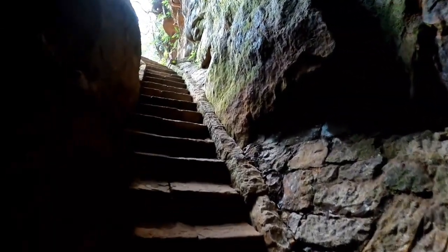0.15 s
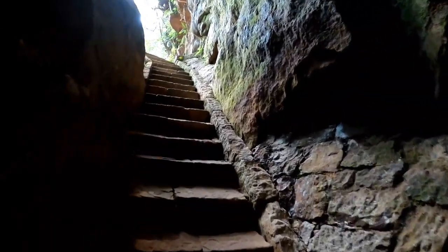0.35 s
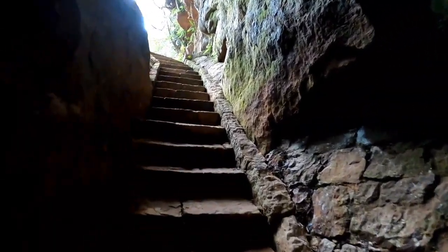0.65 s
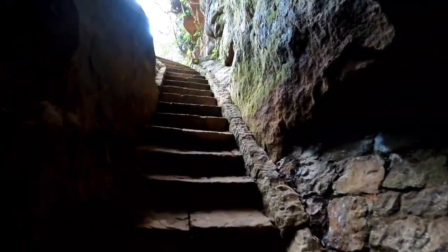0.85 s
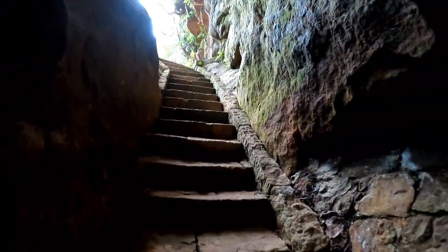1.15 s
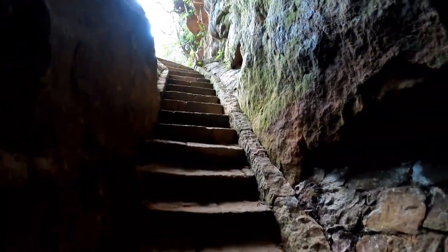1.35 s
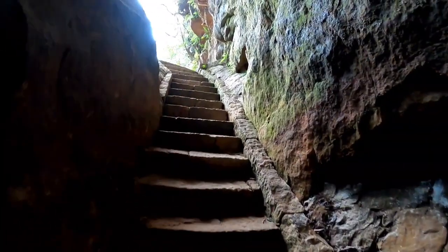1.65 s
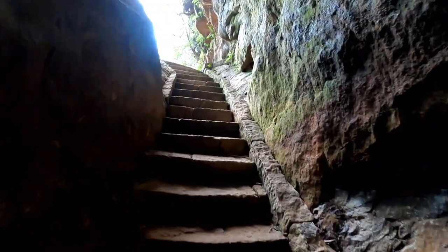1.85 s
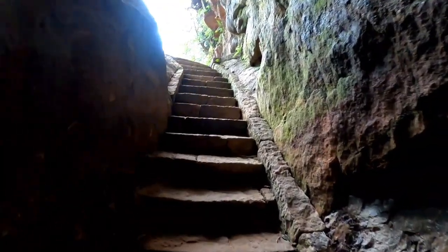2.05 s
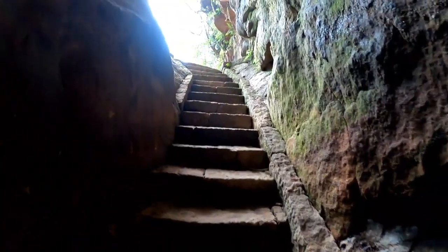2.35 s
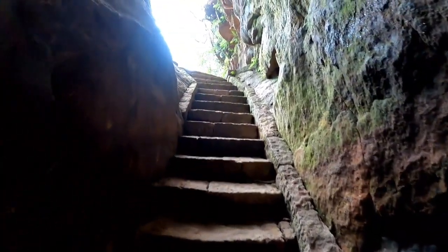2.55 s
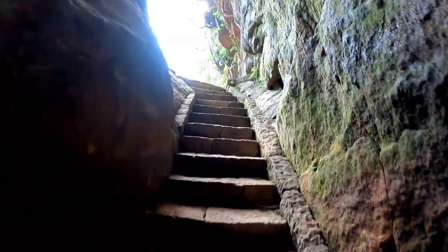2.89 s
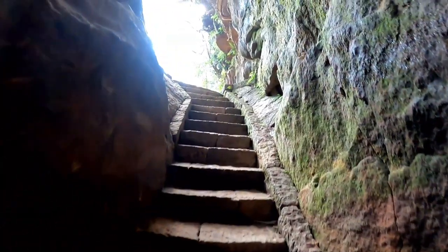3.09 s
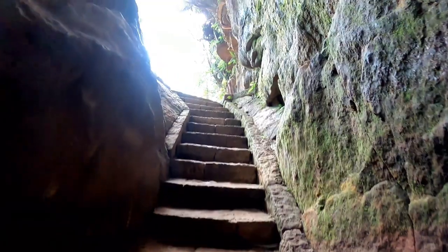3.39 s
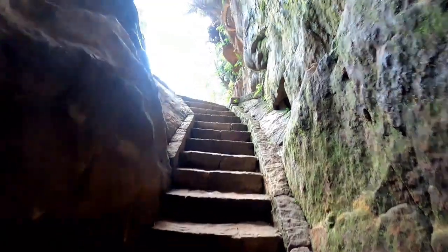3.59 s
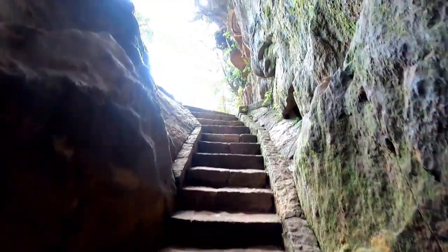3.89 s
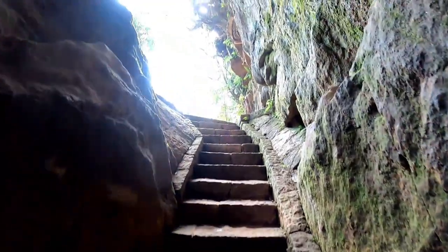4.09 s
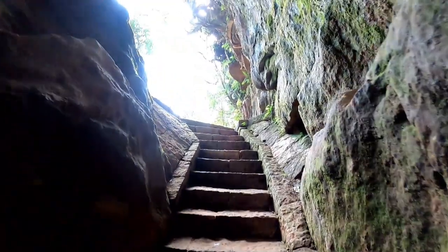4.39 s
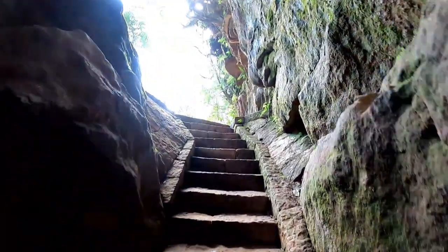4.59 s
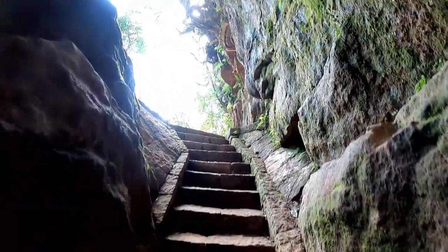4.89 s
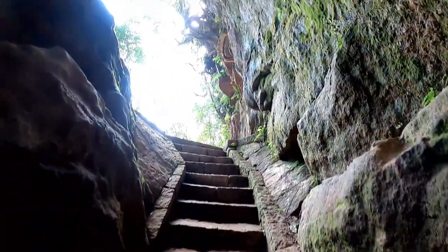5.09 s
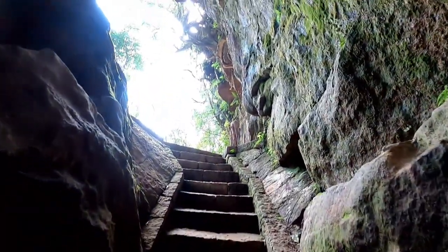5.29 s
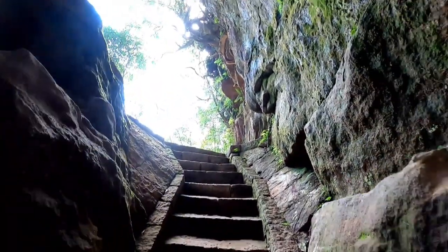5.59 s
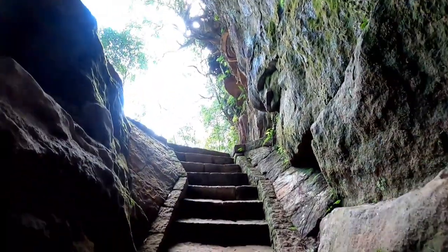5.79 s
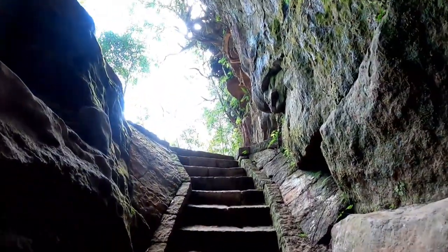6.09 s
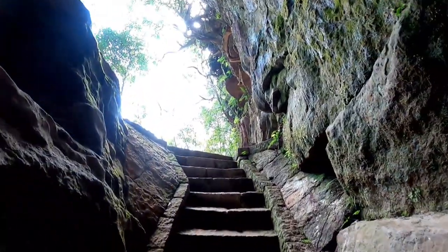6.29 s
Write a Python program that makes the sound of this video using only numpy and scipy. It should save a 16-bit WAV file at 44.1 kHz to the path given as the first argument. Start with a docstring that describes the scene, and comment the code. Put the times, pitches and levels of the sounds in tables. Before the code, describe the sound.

Close, handheld sound of one person climbing stone steps between rock walls. About every 0.8 seconds a shoe thuds down, grit crunches, the sole slaps and sand grinds. Scuffs, taps and dull knocks fall between; a short rubber squeak comes before a sharp double crack midway, and a hollow clatter near five seconds. Walls ring briefly over faint outdoor hiss.

```python
"""In a narrow rock passage, someone climbs gritty stone steps, carrying the microphone.
In every step the shoe skims in, lands with a thud and a crunch, the sole slaps down, and sand grinds under the weight.
Between and around the steps a shoe often scuffs over the stone; soles rasp and squeak.
Short taps and cracks, hollow bumps and a rattle fall between. Filtered noise makes the grit, decaying sines the thuds.
The walls ring briefly over a faint outdoor hiss, a fading rush and the rumble of the carrying hand."""
import sys
import numpy as np
from scipy import signal
from scipy.fft import rfft, irfft, next_fast_len
from scipy.io import wavfile
from scipy.ndimage import uniform_filter1d

SR = 44100
rng = np.random.default_rng(int(sys.argv[2]) if len(sys.argv) > 2 else 0)


def wav_record(signal):
    """Record a signal, one row per channel, as 16-bit PCM in the file named by sys.argv[1]."""
    frames = np.transpose(np.atleast_2d(signal))
    bounded = np.clip(frames, -1, 1)
    # unit amplitude maps onto the largest positive 16-bit level
    quanta = np.round(bounded * 32767).astype(np.int16)
    wavfile.write(sys.argv[1], SR, quanta)


N = 284445
TIME = np.arange(N) / SR

# Levels are inputs to the filters and mix; colour tables give only the relative loudness of frequencies.
# Half length: from the middle of a slide to where its force is down to 61 %.

# A shoe lands: (time [s], thud level [dB], thud pitch [Hz], knock level [dB], crunch level [dB],
#   fine sand level [dB], crunch pitch [Hz], sole's crunch against landing [dB], rise [s], decay [s],
#   sole follows after [s], sole's knock against landing [dB], grinding level [dB], grinding ends after [s])
FOOTSTEPS = [(0.262, -29, 255, -40, -38, -55.5, 2770, -5.5, 0.0025, 0.012, 0.043, -9.5, -51.5, 0.33),
             (1.079, -26, 230, -37, -36, -46.5, 2310, 0, 0.0023, 0.034, 0.048, 0.5, -46.5, 0.26),
             (1.896, -30.5, 170, -43.5, -46.5, -52, 2200, -8.5, 0.0094, 0.014, 0.044, -21, -51, 0.41),
             (2.735, -24, 238, -27.5, -25.5, -38.5, 2500, -11.5, 0.0058, 0.013, 0.052, -11.5, -54, 0.36),
             (3.506, -43, 160, -29.5, -22, -43, 2700, -5.5, 0.011, 0.027, 0.073, -10, -52, 0.41),
             (4.425, -21.5, 170, -33.5, -41.5, -57, 3260, -5.5, 0.0035, 0.021, 0.048, -19, -52.5, 0.41),
             (5.377, -29.5, 186, -36, -28.5, -53, 2800, -7.5, 0.0044, 0.0057, 0.047, -5.5, -52.5, 0.38),
             (6.325, -25.5, 380, -28.5, -38.5, -51, 3550, -8, 0.0021, 0.0045, 0.037, -24, -50, 0.23)]
# Short taps and cracks of shoe and grit, faint to loud:
#   (time [s], crunch level [dB], crunch pitch [Hz], knock level [dB], decay [s])
SHORT_TAPS = [(0.154, -43.5, 2540, -84, 0.025), (0.508, -43, 4000, -73, .008),
              (0.748, -50, 1390, -44, 0.011), (1.049, -43, 3900, -68, 0.003),
              (1.210, -38, 1500, -48, 0.0083), (1.271, -50, 3200, -60, 0.0058),
              (1.314, -43, 1320, -49, .007), (1.45, -49.5, 2140, -50, 0.011), (1.73, -46, 1400, -78, 0.039),
              (2.03, -38.5, 2020, -76, 0.015), (2.125, -44, 3300, -72, 0.0043),
              (2.370, -52, 1500, -49, 0.013), (2.552, -50.5, 2760, -57, 0.021),
              (3.480, -44.5, 2400, -64, 0.014), (3.519, -29, 2540, -32, 0.0026),
              (3.531, -24, 3400, -28, .004), (3.636, -34, 3000, -42, .005), (3.880, -42, 2200, -47, 0.011),
              (3.957, -45, 3160, -48.5, 0.0051), (4.634, -44, 1880, -53, 0.034),
              (4.822, -38.5, 2880, -68, 0.0047), (5.29, -45.5, 3470, -66, 0.014),
              (5.466, -37.5, 4000, -48, 0.0059), (5.536, -39.5, 3080, -51.5, 0.016)]
# Colour of the sole's knock: (frequency [Hz], level [dB per Hz])
KNOCK_COLOUR = [(130, -11.5), (250, -3), (350, -2), (490, 2.5), (610, -3), (800, -3), (1050, 0),
                (1400, -9.5), (2000, -11.5), (4000, -62)]
# Colour of crunching grit: (frequency [Hz], level [dB per Hz])
CRUNCH_COLOUR = [(400, -52), (900, -3.5), (1400, 4.5), (2100, 3.5), (2600, 5), (3000, 3), (3350, 6.5),
                 (3900, 4.5), (4250, 2.5), (4700, -5), (6300, -6.5), (9000, -17.5), (15000, -53)]
# Colour of fine sand: (frequency [Hz], level [dB per Hz])
SAND_COLOUR = [(2000, -13), (4000, -0.5), (5200, -0.5), (6400, -4.5), (8000, -13), (10500, -15),
               (12000, -22.5), (15000, -27)]
# The sole comes down flatter and sandier than the landing
SOLE_SAND_DB, SOLE_THUD_DB, SOLE_HALF_S = 7.5, -11, 0.011
# Sand grinds while the weight rolls over the foot: (rub, crunch, fine sand) against the grinding level
GRIND_TILT_DB, GRIND_FROM_S, GRIND_FADE_S = (-14, -1.5, -6.5), 0.091, 0.059
# Single grains crack under the weight: level against the grinding, decay, range of pitch
CRACK_DB, CRACK_DECAY_S, CRACK_HZ = 5.5, 0.004, (1280, 4140)
HARD_CRUNCH_DB = -25    # crunch level that brings in the narrow peaks fully


def footfalls(tap_rise_s=0.002, step_q=0.85, tap_q=2.8, cracks_per_step=3):
    """Every contact drives the sole's knock and the crunch of grit under it; a few grains crack afterwards."""
    grit = texture(CRUNCH_COLOUR, grains_per_s=7000, grain_db=-2.0, even_s=0.0041)
    power, crunch, hard = np.zeros((3, 2, N))     # power rows: knock, fine sand
    for (s, _, _, knock_db, crunch_db, sand_db, hz, sole_crunch_db, rise, decay,
         sole_after, sole_db, grind_db, grind_ends) in FOOTSTEPS:
        landing = blow(s, rise, decay)
        sole = swell(s + sole_after, SOLE_HALF_S)
        power += drive([knock_db, sand_db], landing)
        power += drive([knock_db + sole_db, sand_db + sole_crunch_db + SOLE_SAND_DB], sole)

        force = np.hypot(landing, from_db(sole_crunch_db) * sole)
        crushed = focus(from_db(crunch_db) * force * grit, hz, step_q)
        crunch += crushed
        hard += min(from_db(crunch_db - HARD_CRUNCH_DB), 1) * crushed

        earliest, latest = (GRIND_FROM_S, CRACK_HZ[0]), (grind_ends, CRACK_HZ[1])
        for after, crack_hz in rng.uniform(earliest, latest, (cracks_per_step, 2)):
            crack = from_db(CRACK_DB + grind_db) * blow(s + after, tap_rise_s, CRACK_DECAY_S)
            crunch += focus(crack * grit, crack_hz, tap_q)
    for s, crunch_db, hz, knock_db, decay in SHORT_TAPS:      # no fine sand here
        force = blow(s, tap_rise_s, decay)
        power[:1] += drive([knock_db], force)
        crunch += focus(from_db(crunch_db) * force * grit, hz, tap_q)
    knock, sand = np.sqrt(power)
    knocks = knock * texture(KNOCK_COLOUR, even_s=0.0036)
    fine_sand = sand * texture(SAND_COLOUR, grains_per_s=13000, grain_db=-1.5)
    return crunch + narrow_peaks(hard) + knocks + fine_sand


# Dull hollow knocks, faint to strong: (time [s], level [dB], pitch [Hz])
DULL_KNOCKS = [(.748, -38.5, 384), (1.446, -45.5, 520), (1.791, -41.5, 277), (1.803, -42, 450),
               (1.873, -41, 420), (1.93, -36, 330), (2.258, -45, 300), (2.282, -44, 320), (4.926, -31, 330),
               (4.944, -34, 250), (4.954, -24.5, 730), (4.977, -28, 600), (5.001, -34, 480),
               (5.765, -41.5, 330), (5.788, -37, 330), (5.812, -41, 322), (5.975, -46, 450),
               (6.203, -34, 443), (6.232, -37.5, 400)]
# Shoe and step under the weight of a footfall: (frequency [Hz], level [dB], time to fall 60 dB [s])
THUD_MODES = [(48, -15, .1), (80, -5.5, 0.036), (163.5, -8.5, 0.094), (224.6, -7.5, 0.071),
              (327.3, -6.5, 0.046), (442, -4.5, 0.058), (774, -10, 0.072), (1110, -30, 0.021),
              (1270, -18, .05)]


def thuds(uneven_db=2.5, push_s=0.0041, db_per_octave=8.0, slap_hz=200):
    """Weight pushed onto the step rings the same low modes; each contact favours those near one pitch."""
    contacts = [row[:3] for row in FOOTSTEPS] + list(DULL_KNOCKS)
    contacts += [(s + sole_after, db + sole_db + SOLE_THUD_DB, slap_hz)
                 for s, db, *_, sole_after, sole_db, _, _ in FOOTSTEPS]
    hz, mode_db, t60 = np.transpose(THUD_MODES)[:, :, None]
    age = TIME[:SR // 4]
    out = np.zeros(N + SR)
    signs = (-1) ** np.arange(len(THUD_MODES))[:, None]
    envelopes = from_db(mode_db - 60 * age / t60) * np.minimum(age / push_s, 1)
    rings = signs * envelopes * np.sin(2 * np.pi * hz * age)
    chances = rng.normal(0, uneven_db, (len(contacts), len(THUD_MODES)))
    for (s, db, pitch), chance in zip(contacts, chances):
        start = int(s * SR)
        strengths = db + chance - db_per_octave * np.abs(np.log2(hz[:, 0] / pitch))
        out[start:start + len(age)] += from_db(strengths) @ rings
    return out[:N]


# Narrow peaks colour the crunch of hard landings:
#   (frequency [Hz], width [Hz], level against the crunch [dB])
CRUNCH_PEAKS = [(2512, 41, 3.5), (3100, 43, 3), (3725, 72, 3.5), (3990, 26, 5)]


def narrow_peaks(x):
    """A few narrow resonant filters pick out pitches in the crunch of hard landings."""
    out = 0
    for hz, width, db in CRUNCH_PEAKS:
        b, a = signal.iirpeak(hz, hz / max(width, 10), fs=SR)
        out = out + from_db(db) * signal.lfilter(b, a, x)
    return out


# A shoe scuffs over the stone: (time [s], rub level [dB], crunch level [dB], crunch pitch [Hz],
#   fine sand level [dB], half length [s])
SHOE_SCUFFS = [(0.543, -64, -46.5, 4000, -56, 0.017), (1.293, -70, -47.5, 2350, -74, 0.024),
               (1.838, -62, -49, 2200, -55, 0.017), (2.276, -53.5, -51.5, 1960, -67, 0.032),
               (2.703, -54.5, -53, 2400, -60, 0.05), (3.007, -75, -46.5, 3980, -51.5, 0.017),
               (3.039, -50.5, -40, 1640, -46, 0.0095), (3.085, -39.5, -43, 3520, -51, 0.026),
               (3.765, -53.5, -57, 1700, -72, 0.015), (3.826, -55.5, -50, 3430, -70, 0.041),
               (4.764, -76, -61, 3500, -53.5, 0.017), (4.978, -52, -49, 1400, -68, 0.037),
               (5.322, -52, -56, 1300, -64, 0.017), (5.356, -61, -51.5, 3700, -57, 0.016),
               (5.759, -60, -49.5, 2980, -53, 0.016), (5.792, -52, -51, 2440, -55, 0.021),
               (6.238, -55, -76, 1000, -78, 0.027)]
# Colour of dragged grit: (frequency [Hz], level [dB per Hz])
DRAG_COLOUR = [(400, -41), (900, 8.5), (1500, 3.5), (2400, 5), (3300, 4), (4100, 4.5), (4800, -22),
               (6500, -41), (10000, -44)]
# The shoe skims in around the landing, strongest just before it: (rub, crunch, fine sand)
SKIM_DB, SKIM_LEAD_S, SKIM_HALF_S = (-71, -59.5, -65), 0.0038, 0.079


def scuffs(catch_db=1.5, catches_per_s=70, drag_q=2.0):
    """A sole that skims in, bears weight or scuffs over stone rubs dully and rolls sand, catching unevenly."""
    power = np.zeros((3, N))     # rows: rub, crunch, fine sand
    for s, *_, grind_db, grind_ends in FOOTSTEPS:
        power += drive(SKIM_DB, swell(s - SKIM_LEAD_S, SKIM_HALF_S))
        weight = press(s + GRIND_FROM_S, s + grind_ends, GRIND_FADE_S)
        power += drive(np.add(GRIND_TILT_DB, grind_db), weight)
    drag = texture(DRAG_COLOUR, grains_per_s=3000, grain_db=0.0)
    drags = 0
    for s, rub_db, crunch_db, hz, sand_db, half_length in SHOE_SCUFFS:
        force = swell(s, half_length)
        power[::2] += drive([rub_db, sand_db], force)
        drags = drags + focus(from_db(crunch_db) * force * drag, hz, drag_q)
    grip = from_db(catch_db * wander(catches_per_s))
    rub, crunch, sand = grip * np.sqrt(power)
    return (rub * texture(KNOCK_COLOUR, grains_per_s=2500, grain_db=-0.5, even_s=0.1)
            + crunch * rolling_grit() + grip * drags
            + sand * texture(SAND_COLOUR, grains_per_s=14000, grain_db=2.5))


def rolling_grit(catch_db=3.0, catches_per_s=55, q=5.2, sizes=5):
    """Grains of each size catch and let go on their own, in short bursts."""
    grains = texture(DRAG_COLOUR, grains_per_s=2200, grain_db=1.5)
    out = 0
    for k, hz in enumerate(np.geomspace(*CRACK_HZ, sizes)):
        b, a = signal.iirpeak(hz, max(q, .5), fs=SR)
        grip = from_db(catch_db * wander(catches_per_s))
        out = out + (-1) ** k * grip * signal.lfilter(b, a, grains)
    return rms_one(out)


# The sole twists on the stone:
#   (time [s], level [dB], half length [s], pitch in the middle [Hz], glide [octaves per s])
SOLE_RASPS = [(0.401, -51, 0.01, 2200, 1), (.535, -51, 0.018, 4300, 0), (2.183, -52, .025, 4200, -1),
              (3.766, -50, 0.011, 1680, 0.5), (4.661, -57, 0.051, 1600, 7), (4.695, -51, 0.012, 4050, -0.5),
              (4.98, -51, 0.014, 3850, -1.5), (5.651, -56, .022, 1400, -4.5)]


def rasps(width_hz=230, catch_db=-0.5, catches_per_s=60):
    """A twisting sole rasps in one narrow resonance that glides as the contact shifts."""
    low_pass = signal.butter(2, width_hz / 2, fs=SR, output="sos")
    chatter = rms_one(signal.sosfilt(low_pass, rng.standard_normal((2, N))))
    chatter = chatter * from_db(catch_db * wander(catches_per_s))
    out = 0
    for s, db, half_length, hz, glide in SOLE_RASPS:
        octaves = np.clip(glide * (TIME - s), -1, 1)
        phase = 2 * np.pi * np.cumsum(hz * 2 ** octaves) / SR
        # moves the slow chatter up to the gliding pitch
        rasp = chatter[0] * np.cos(phase) + chatter[1] * np.sin(phase)
        out = out + from_db(db) * swell(s, half_length) * rasp
    return out


# Rubber catches on the stone: (time [s], level [dB], half length [s])
RUBBER_SQUEAKS = [(3.452, -45, 0.0036), (3.491, -42.5, 0.0092)]
# Colour of the squeak: (frequency [Hz], level [dB per Hz])
SQUEAK_COLOUR = [(900, -24), (1250, -18), (1400, -2.5), (1600, -31), (2300, -13), (3000, -30), (8000, -47)]


def squeaks():
    """Rubber catching on stone gives short swells of noise peaked at a few pitches."""
    force = sum(from_db(db) * swell(s, half_length) for s, db, half_length in RUBBER_SQUEAKS)
    return force * texture(SQUEAK_COLOUR, even_s=0.0065)


# One bright tick right by the microphone: (time [s], level [dB], decay [s])
BRIGHT_TICK = (1.832, -39, 0.0014)
# Colour of the tick: (frequency [Hz], level [dB per Hz])
BRIGHT_TICK_COLOUR = [(500, -27), (2000, -6), (6000, 6), (10000, 2), (15000, -21)]


def tick(rise_s=0.00053):
    """A very short, bright burst of noise snaps on and dies away."""
    s, db, decay = BRIGHT_TICK
    return from_db(db) * blow(s, rise_s, decay) * texture(BRIGHT_TICK_COLOUR)


# Hollow bumps close by:
#   (time [s], level [dB], starting pitch [Hz], decay [s], left minus right [dB])
HOLLOW_BUMPS = [(1.939, -34.5, 268, 0.014, 1), (2.932, -42, 156, 0.011, 8), (3.194, -39.5, 111, 0.011, 18),
                (3.263, -45, 160, 0.0061, -8), (4.209, -48.5, 180, 0.0135, -3),
                (4.953, -28, 160, 0.01, -10), (6.328, -36, 91, 0.011, 5)]


def bumps(rise_s=0.0033, sag_per_s=2.1):
    """Each bump rings a few cycles, its pitch sagging as it dies."""
    out = np.zeros((2, N))
    for s, db, hz, decay, pan_db in HOLLOW_BUMPS:
        age = np.clip(TIME - s, 0, .2)
        tone = np.sin(2 * np.pi * hz * age * (1 - sag_per_s * age))
        sides_db = db + pan_db * np.array([[.5], [-.5]])
        out += from_db(sides_db) * blow(s, rise_s, decay) * tone
    return out


# Something hollow rattles: (time [s], level [dB], decay [s])
HOLLOW_RATTLE = (4.932, -33.5, 0.028)
# Colour of the rattle: (frequency [Hz], level [dB per Hz])
HOLLOW_RATTLE_COLOUR = [(60, -18), (165, 7.5), (230, -5), (330, 5.5), (470, 7), (600, -9), (780, 1),
                        (950, -19), (1300, -10), (1700, -17), (4000, -19.5), (6000, -41), (12000, -68)]


def clonk(rise_s=0.03):
    """A hollow rattle of coloured noise swells and dies away."""
    s, db, decay = HOLLOW_RATTLE
    return from_db(db) * blow(s, rise_s, decay) * texture(HOLLOW_RATTLE_COLOUR, even_s=0.0055)


# Ledges near the feet: (average echo delay [s], level [dB])
LEDGE_ECHOES = [(.0017, -22), (.0036, -17), (.0062, -21)]


def ledges(x, sway=0.127, sways_per_s=2.5, lowest_hz=900):
    """Small ledges mirror mainly the treble; their paths change as the climber moves, recolouring each step."""
    high_pass = signal.butter(1, lowest_hz, "high", fs=SR, output="sos")
    treble = signal.sosfilt(high_pass, x)
    knots = np.linspace(0, TIME[-1], int(TIME[-1] * sways_per_s) + 1)
    out = x.copy()
    for delay, db in LEDGE_ECHOES:
        drift = np.interp(TIME, knots, rng.uniform(-1.067, 1, len(knots)))
        path = delay * (1 + sway * drift)
        out += from_db(db) * np.array([np.interp(TIME - path, TIME, side) for side in treble])
    return out


# How long the passage rings: (frequency [Hz], time to fall 60 dB [s])
PASSAGE_RING = [(100, 0.37), (400, 0.19), (1500, 0.43), (4000, 0.26), (12000, 0.36)]


def passage(x, near_db=-6.5, near_decay_s=0.024, tail_db=-9.5, tail_rise_s=0.035):
    """Treads and close walls throw back a scatter of early echoes; the cleft then rings on, by band."""
    size = SR     # one second
    t, hz = TIME[:size], bins(size)
    hits = (rng.random(size) < 500 / SR) * (t > .002)     # about 500 echoes per second
    echoes = rng.standard_normal((2, size)) * hits
    near = irfft(spread(echoes * np.exp(-t / near_decay_s)), size)

    diffuse, tail = spread(rng.standard_normal((2, size))), 0
    edges = np.geomspace(40, 20480, 10)     # octave bands
    for low, high in zip(edges, edges[1:]):
        band = irfft(diffuse * ((hz >= low) & (hz < high)), size)
        t60 = at_hz(PASSAGE_RING, np.sqrt(low * high))
        tail = tail + band * from_db(-60 * t / t60)
    tail = tail * np.minimum(t / tail_rise_s, 1)
    response = (from_db(near_db) * rms_one(near) + from_db(tail_db) * rms_one(tail)) / np.sqrt(size)
    # the left channel alone feeds both sides of the echo
    return x + signal.fftconvolve(x[:1], response, axes=1)[:, :N]


# Jolts of the hand that carries the microphone: (time [s], level [dB])
HAND_JOLTS = [(.262, -50), (1.078, -50.5), (1.59, -55), (1.896, -47), (2.736, -47.5), (3.507, -49.5),
              (4.425, -49), (5.378, -47), (6.325, -66)]
# Colour of the jolts: (frequency [Hz], level [dB per Hz])
HAND_JOLT_COLOUR = [(25, 4), (45, -1), (70, 0.5), (110, -13), (200, -13), (500, -40)]


def jolts(rise_s=0.013, decay_s=0.078):
    """A low rumble that dies away after every jolt."""
    force = sum(from_db(db) * blow(s, rise_s, decay_s) for s, db in HAND_JOLTS)
    return force * texture(HAND_JOLT_COLOUR)


# Outdoor hiss before its wavering: (time [s], level [dB])
HISS_LEVEL = [(0, -60.5), (1.6, -60.5), (2.5, -57), (3.3, -57), (4.15, -56.5), (4.35, -60), (5.2, -62),
              (6.1, -57), (6.45, -62)]
# Colour of the hiss: (frequency [Hz], level [dB per Hz])
HISS_COLOUR = [(25, -3), (50, 0), (105, -5), (170, 5), (280, -5), (520, -6.5), (720, -12.5), (1100, -6.5),
               (2000, -6.5), (4100, -8), (4600, -14.5), (7000, -22), (10000, -31.5), (15000, -41)]
# A soft rush low in the passage, before its wavering: (time [s], level [dB])
SOFT_RUSH_LEVEL = [(0, -59.5), (.25, -69), (.35, -53.5), (.7, -58.5), (1.05, -61), (1.4, -94)]
# Colour of the rush: (frequency [Hz], level [dB per Hz])
SOFT_RUSH_COLOUR = [(100, -55), (240, -25), (330, -16.5), (500, -31.5), (1000, -35), (4000, -30.5),
                    (7400, -36), (8300, -41.5), (15000, -52)]


def background():
    """Outdoor hiss, and a soft rush that is left behind on the way up; both waver a little."""
    return wavering(HISS_LEVEL, HISS_COLOUR) + wavering(SOFT_RUSH_LEVEL, SOFT_RUSH_COLOUR)


def wavering(levels, colour, waver_db=3.5, wavers_per_s=9):
    """Steady coloured noise follows a slow level course with small random swings."""
    level_db = np.interp(TIME, *np.transpose(levels)) + waver_db * wander(wavers_per_s)
    return from_db(level_db) * texture(colour)


def texture(colour, grains_per_s=0, grain_db=0, even_s=0):
    """Stereo noise of rms 1: smooth, or made of random grains; evened out over even_s if given."""
    size = next_fast_len(N, True)
    pair = rng.standard_normal((2, size))
    if grains_per_s:
        hits = rng.random(size) < grains_per_s / SR
        pair = pair * hits * from_db(grain_db * np.minimum(rng.exponential(1, size), 4))
    noise = irfft(spread(pair) * from_db(at_hz(colour, bins(size))), size)[:, :N]
    if even_s:
        local_power = uniform_filter1d(np.mean(noise ** 2, axis=0), int(even_s * SR) + 1)
        noise = noise / np.sqrt(local_power + 1e-12)
    return rms_one(noise)


# How alike left and right are: (frequency [Hz], likeness [-1 to 1, clipped just inside])
SIDE_LIKENESS = [(50, 0.37), (110, -0.6), (200, 0.5), (600, 1), (1300, 0.82), (2500, 0.7), (4200, 0.65),
                 (7000, 0.08), (14000, 1.3)]


def spread(pair):
    """Two unrelated signals become the spectra of left and right, sharing more where the likeness is high."""
    alike = np.clip(at_hz(SIDE_LIKENESS, bins(pair.shape[1])), -.99, .99)
    mid, side = rfft(pair)
    return np.sqrt(1 + alike) * mid + np.sqrt(1 - alike) * side * [[1], [-1]]


def focus(x, hz, q, leak_db=-10):
    """Each spot of stone clacks in a broad resonance of its own; some plain sound leaks past it."""
    b, a = signal.iirpeak(hz, max(q, .5), fs=SR)
    return signal.lfilter(b, a, x) + from_db(leak_db) * x


def blow(s, rise, decay):
    """Force of a contact: it builds quickly, then dies away."""
    age = np.maximum(TIME - s, 0)
    return np.minimum(age / rise, 1) * np.exp(-np.clip((age - rise) / decay, 0, 40))


def swell(s, half_length):
    """Force of a slide: it grows and fades about its middle."""
    return np.exp(-.5 * np.minimum(((TIME - s) / half_length) ** 2, 80))


def press(start, end, fade):
    """Force of the body's weight: it comes on, holds and lets go."""
    return 0.23 * (1 + np.tanh((TIME - start) / fade)) * (1 - np.tanh((TIME - end) / fade))


def drive(levels_db, force):
    """Power that one force gives to each of several layers."""
    return np.outer(from_db(levels_db), force) ** 2


def wander(per_s):
    """A random course of straight lines between per_s random points a second."""
    knots = np.arange(0, TIME[-1], 1 / per_s)
    return np.interp(TIME, knots, rng.standard_normal(len(knots)))


def from_db(db):
    """Decibels to gain."""
    return 10 ** (np.asarray(db) / 20)


def rms_one(x):
    """Scale to rms 1."""
    return x / np.sqrt(np.mean(x ** 2) + 1e-20)


def at_hz(points, hz):
    """Read a table on a log-frequency axis."""
    f, value = np.transpose(points)
    return np.interp(np.log(np.maximum(hz, 1)), np.log(f), value)


def bins(size):
    """Frequencies of a real FFT."""
    return np.arange(size // 2 + 1) * SR / size


def scene(shoes_db=-0.88):
    """Shoes and bumps in the passage, over handling rumble and the background."""
    contacts = footfalls() + scuffs() + rasps() + squeaks() + tick()
    shoes = from_db(shoes_db) * ledges(contacts)
    return passage(thuds() + shoes + bumps() + clonk()) + jolts() + background()


# Balance of the microphone pair: (frequency [Hz], left minus right [dB])
PORT_BALANCE = [(50, 4), (110, 2.5), (200, -4.5), (380, -3), (690, -3), (1270, 1.5), (2400, 4), (4300, 3),
                (8000, -3), (14000, 2)]
CUTOFF_HZ = 14800


def record(dry):
    """Each microphone port has its own colour, the left one hears a moment later; the top is cut."""
    size = next_fast_len(N + 4096, True)
    hz = bins(size)
    colour = from_db(at_hz(PORT_BALANCE, hz) * np.array([[.5], [-.5]]))
    delay = np.exp(-2j * np.pi * hz / SR * np.array([[1], [0]]))     # left: one sample late
    low_pass = 1 / np.sqrt(1 + (hz / CUTOFF_HZ) ** 160)
    return irfft(rfft(dry, size) * colour * delay * low_pass, size)[:, :N]


dry = scene()
out = record(dry)
wav_record(out)
```